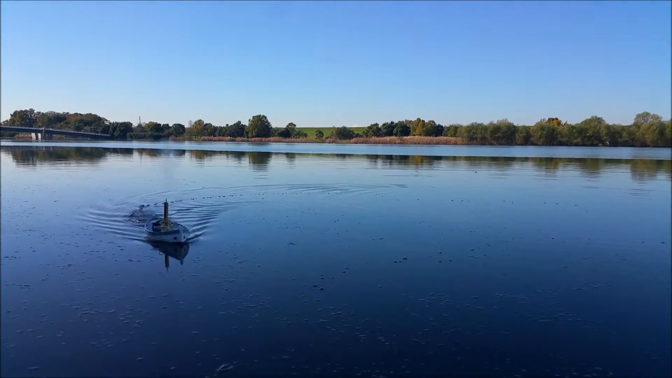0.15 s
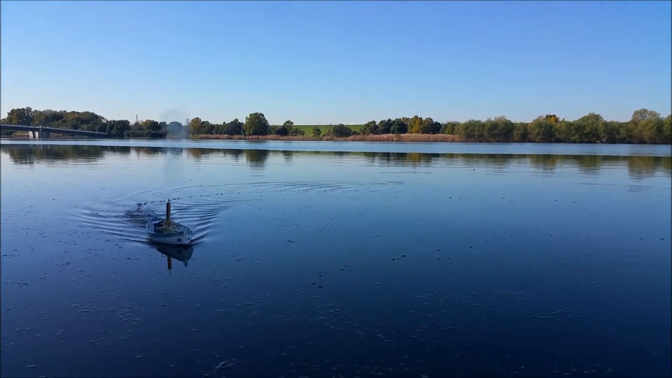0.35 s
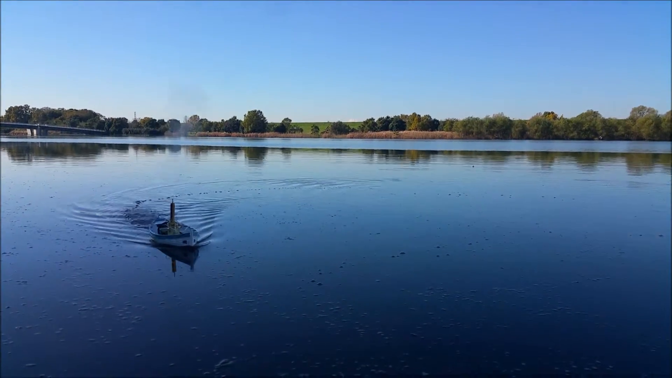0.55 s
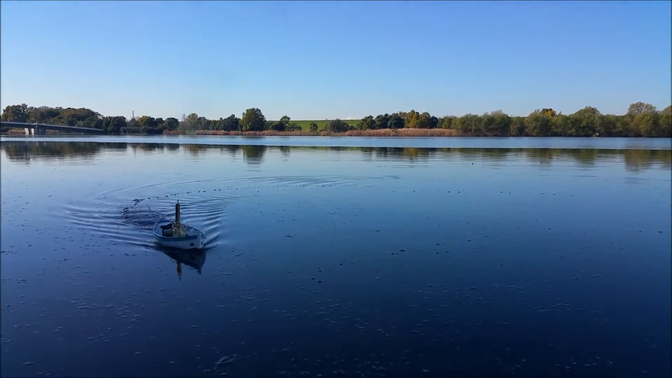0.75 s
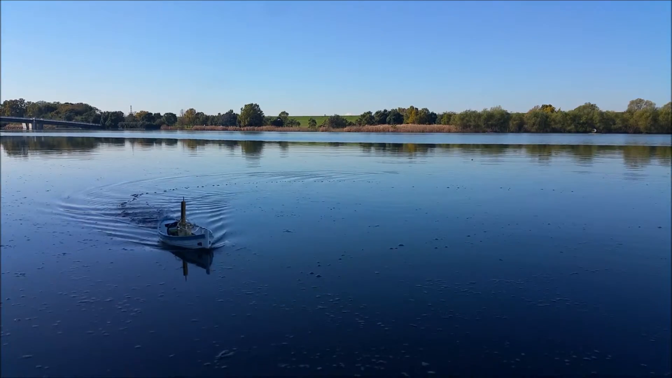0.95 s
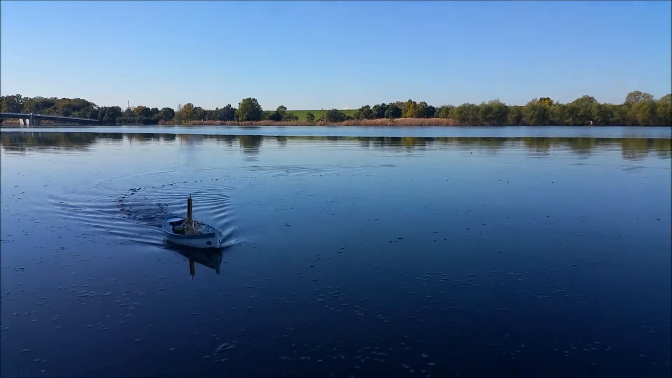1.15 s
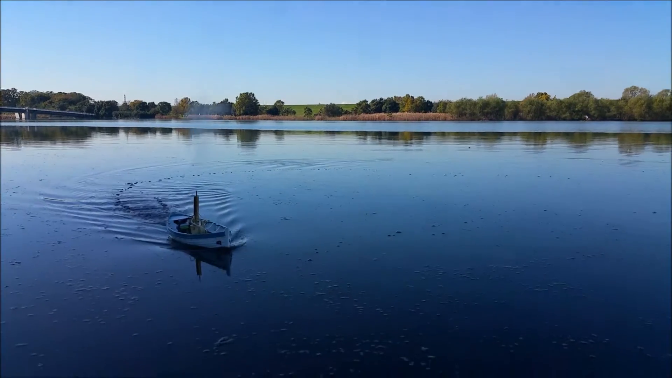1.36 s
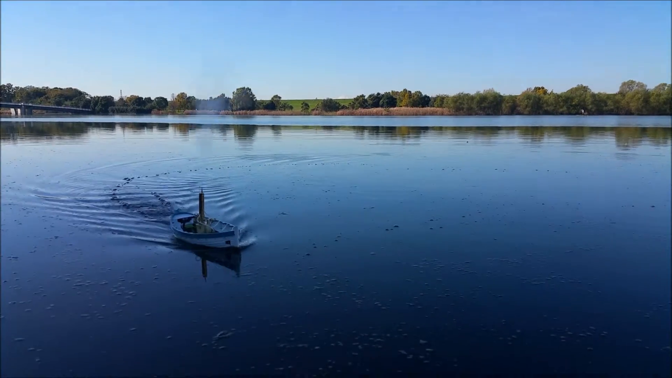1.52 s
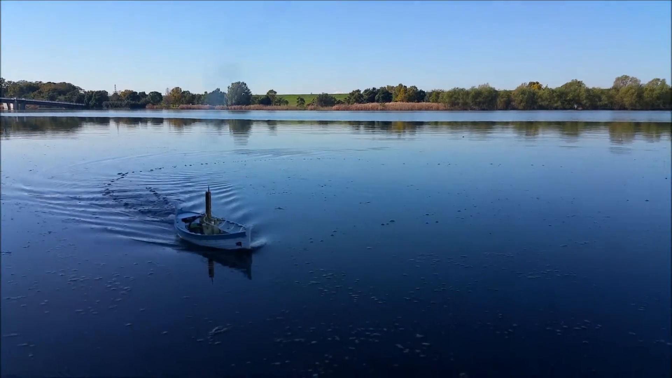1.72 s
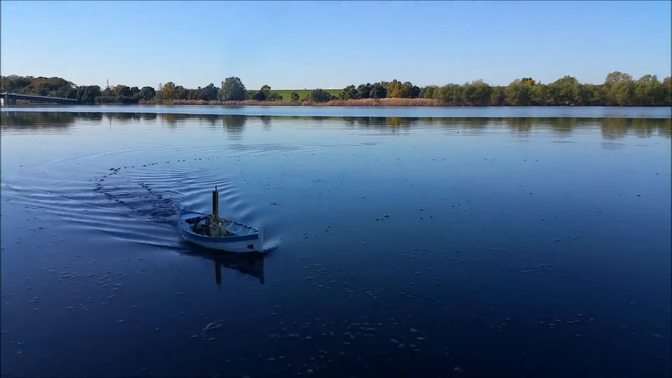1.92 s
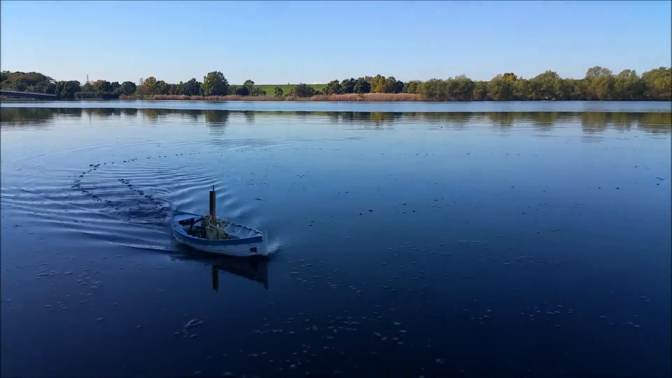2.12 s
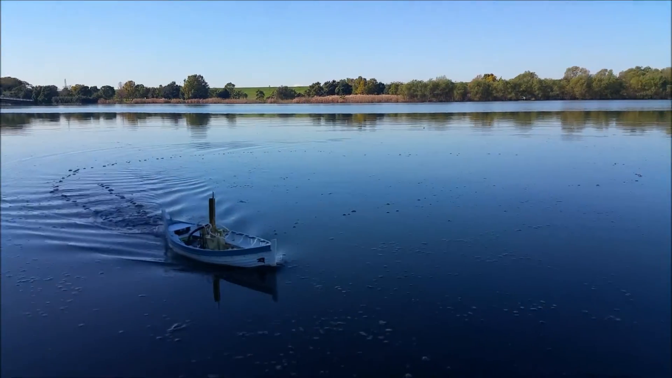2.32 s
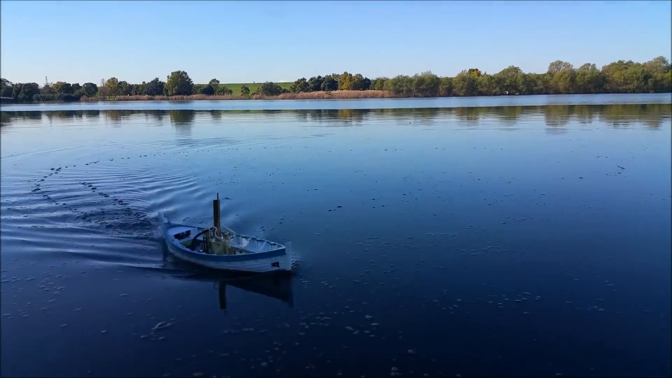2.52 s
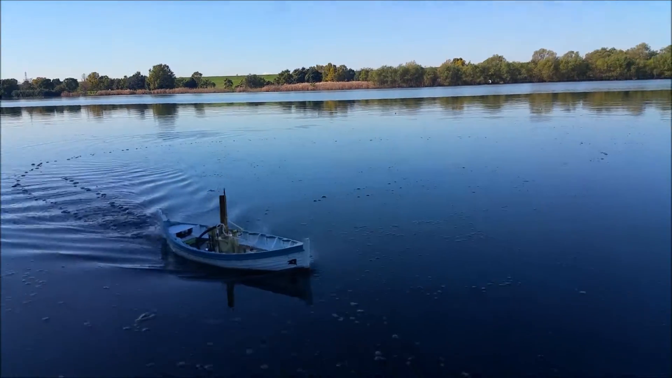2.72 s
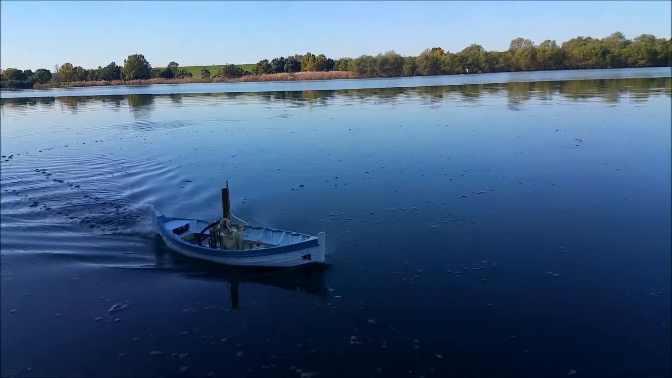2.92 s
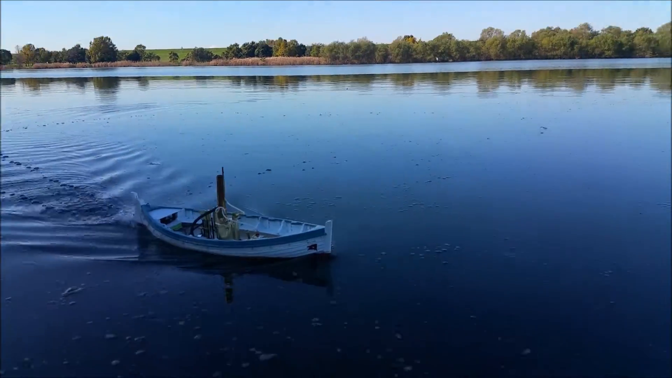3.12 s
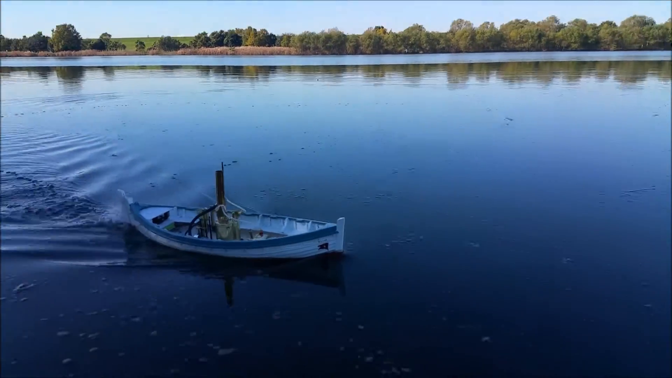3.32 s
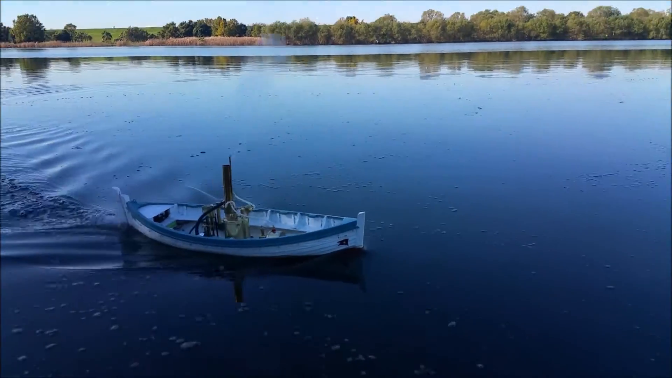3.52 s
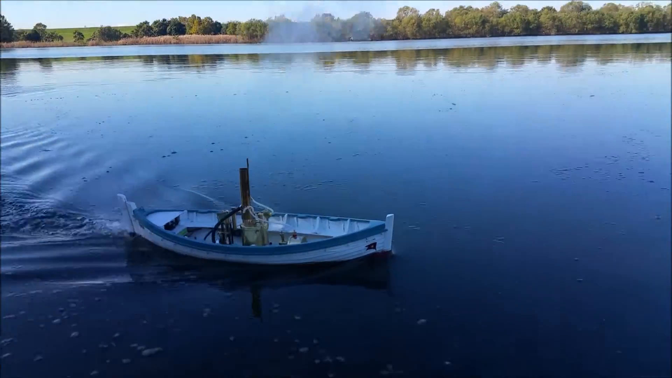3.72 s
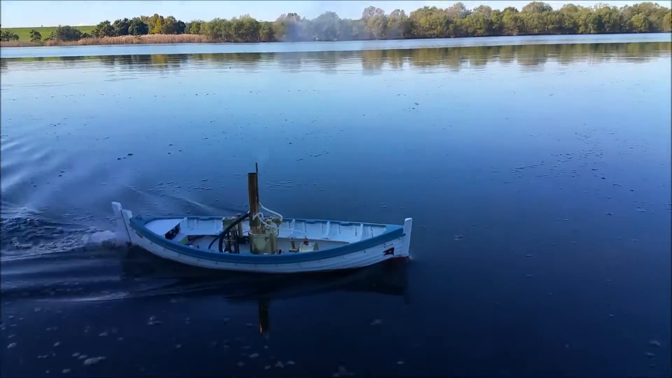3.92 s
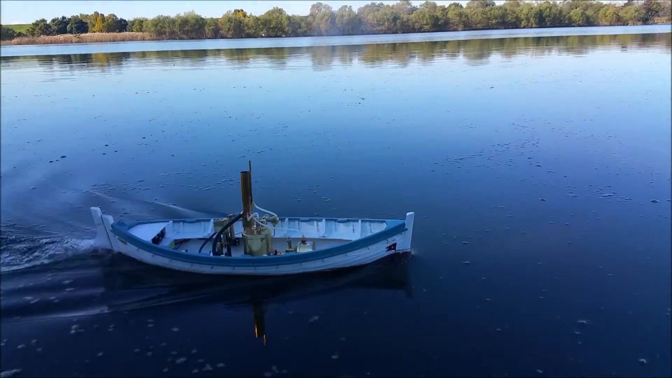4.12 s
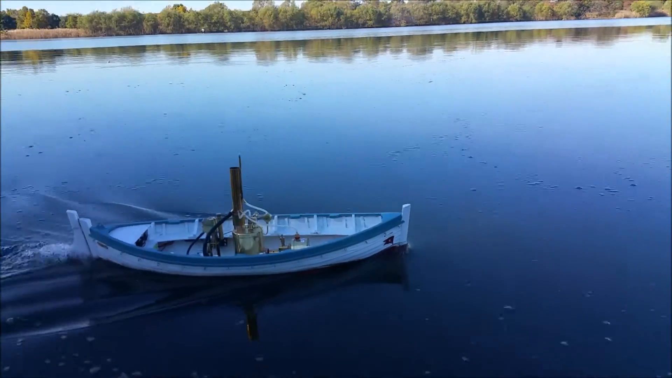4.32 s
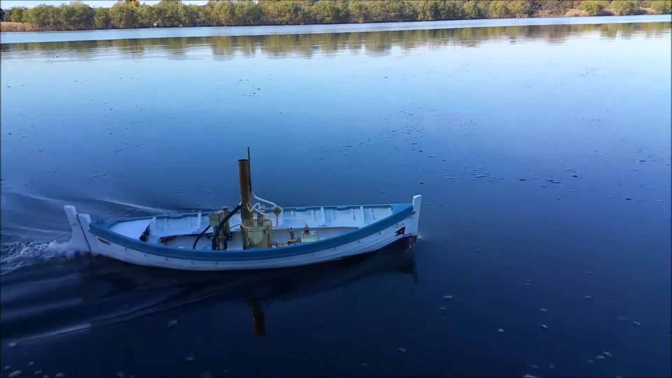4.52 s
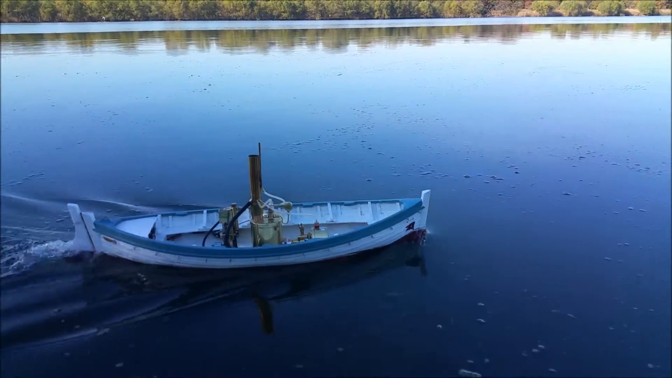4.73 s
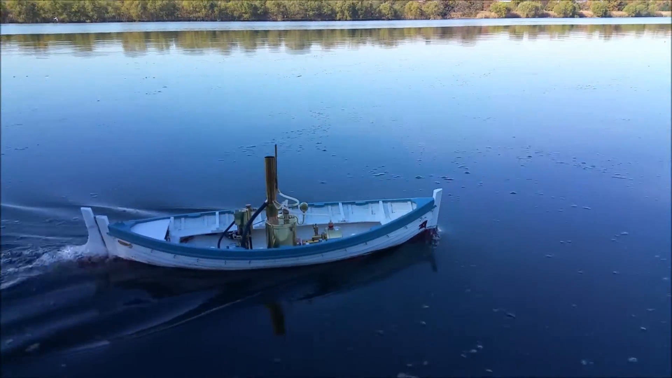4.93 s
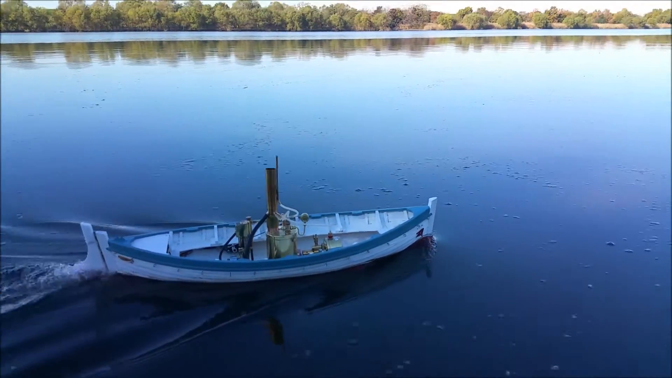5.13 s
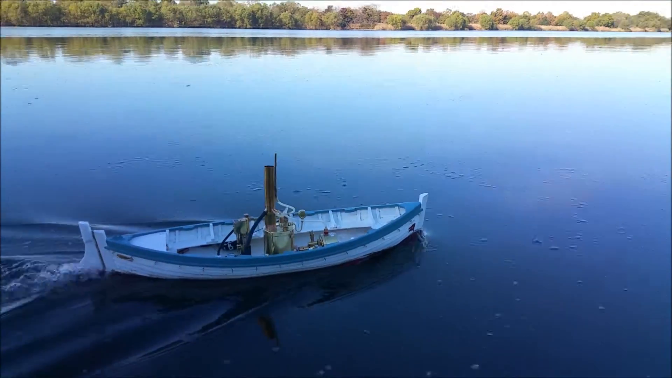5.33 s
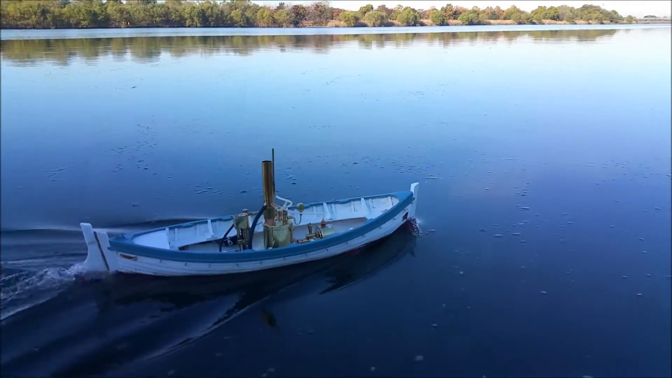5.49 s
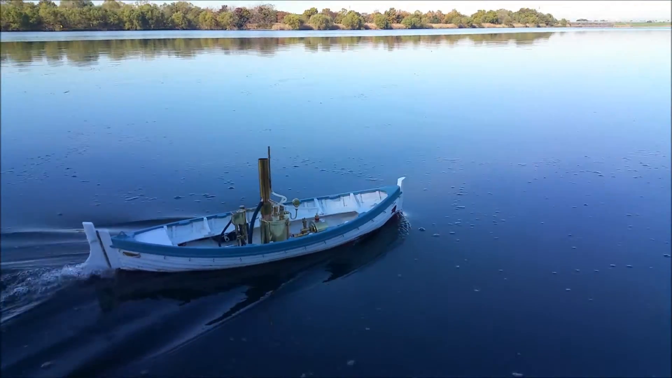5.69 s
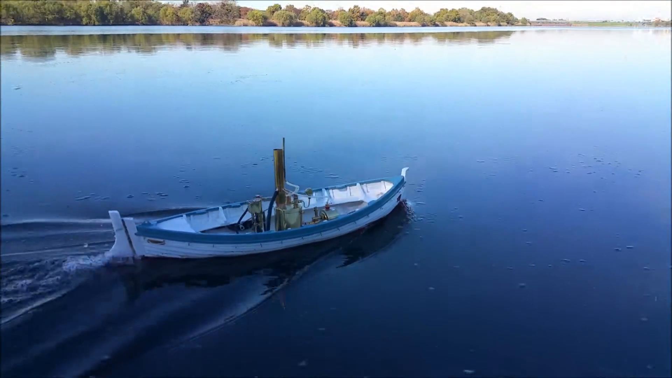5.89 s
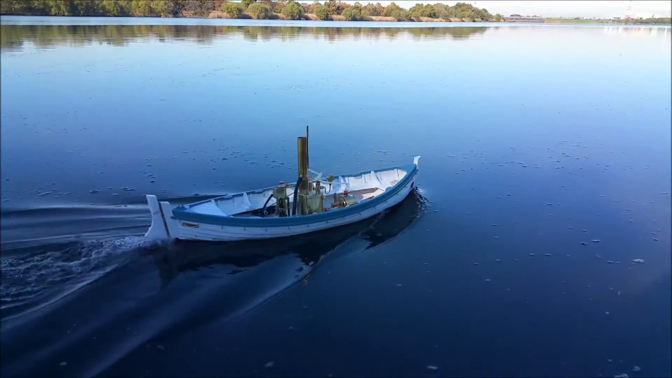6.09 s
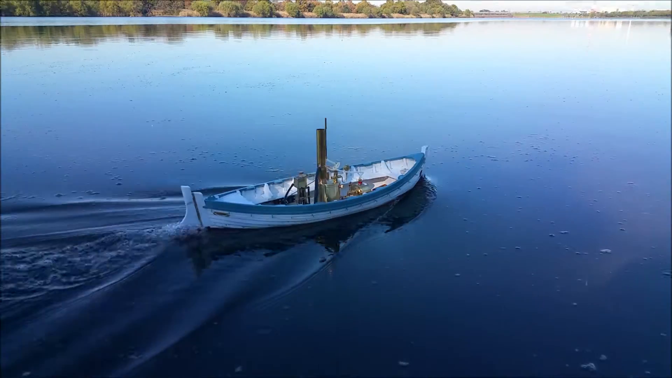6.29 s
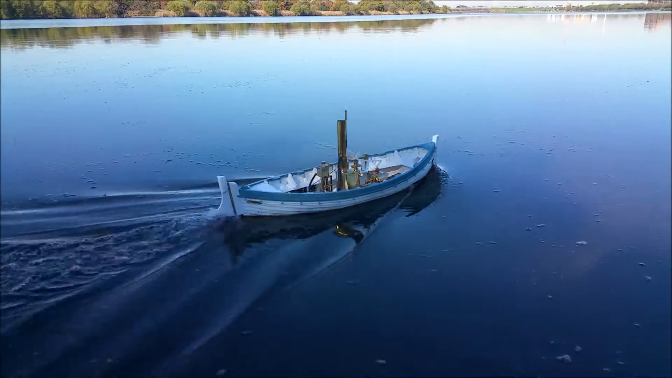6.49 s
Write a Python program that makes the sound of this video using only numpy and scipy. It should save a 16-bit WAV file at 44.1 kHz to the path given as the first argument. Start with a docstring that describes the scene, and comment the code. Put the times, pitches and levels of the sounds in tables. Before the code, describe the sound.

Outdoors by still water, a piercing steam whistle sounds three times, twice close together and once more later, much louder than anything else. Beneath it a small burner roars and a little steam engine clatters and puffs very fast, growing steadily as the boat nears. After the last blast it passes right by the microphone with sputtering hiss, a few hull knocks and bubbling at the bow, then eases slightly away.

```python
"""A shrill steam whistle sounds, the first of three blasts from a model launch on a calm lake.
A jet drives its short pipe; the tone interferes with its reflection from the water, swelling and
fading differently at each ear, and the bank returns a faint echo. The boat grows louder as it passes
close by: the burner roars through the resonances of the flue, the engine rattles and puffs four times
a turn, the funnel spits, and bubbles ring in the bow wave."""
import sys
import numpy as np
from scipy import signal
from scipy.fft import rfft, irfft, next_fast_len
from scipy.io import wavfile
from scipy.ndimage import uniform_filter1d

SR = 44100
rng = np.random.default_rng(int(sys.argv[2]) if len(sys.argv) > 2 else 0)


def to_wav(sig):
    """Store sig (one row per channel, or 1-D mono) as 16-bit WAV at the path in sys.argv[1].

    Samples outside -1..1 are clipped; the rate is SR.
    """
    pcm = np.clip(np.atleast_2d(sig), -1, 1) * 32767
    pcm = np.round(pcm).astype(np.int16)
    wavfile.write(sys.argv[1], SR, pcm.T)  # frames by channels


N = 288855
TIME = np.arange(N) / SR


def amp(db):
    """Amplitude ratio of a level in decibels."""
    return 10 ** (np.asarray(db) / 20)


def unit(x):
    """Normalisation to rms 1."""
    return x / np.sqrt(np.mean(x ** 2) + 1e-20)


def curves(rows):
    """Linear interpolation of each column of a timed table, at every sample."""
    times, *columns = np.transpose(rows)
    return [np.interp(TIME, times, column) for column in columns]


def spectrum_at(points, hz):
    """Interpolation of a spectrum on a logarithmic frequency axis."""
    f, value = np.transpose(points)
    return np.interp(np.log(hz + 1), np.log(f), value)


def colour(x, points):
    """Filtering by multiplication in the frequency domain."""
    size = next_fast_len(N + 4096)
    gain = amp(spectrum_at(points, np.fft.rfftfreq(size, 1 / SR)))
    return irfft(rfft(x, size) * gain, size)[..., :N]


# Likeness of the noise at the two ears: f/Hz, correlation coefficient
COHERENCE = [(30, 0.91), (150, 0.95), (400, 1), (700, 1), (1100, 0.13), (1800, 1), (2800, 0.36), (5000, 0),
             (15000, 0)]
def noise():
    """Partially coherent white noise at two ears: alike in the bass, independent in the high treble."""
    size = next_fast_len(N)
    mid, side = rfft(rng.standard_normal((2, size)))
    likeness = np.clip(spectrum_at(COHERENCE, np.fft.rfftfreq(size, 1 / SR)), -1, 1)
    mid, side = mid * np.sqrt((1 + likeness) / 2), side * np.sqrt((1 - likeness) / 2)
    return irfft(np.array([mid + side, mid - side]), size)[:, :N]


def wander(hz):
    """Random fluctuation of rms 1: noise low-passed at hz."""
    size = next_fast_len(N)
    f = np.fft.rfftfreq(size, 1 / SR)
    return unit(irfft(rfft(rng.standard_normal(size)) / (1 + (f / hz) ** 4), size)[:N])


def resonate(x, hz, width):
    """A damped resonator of peak gain 1; its centre may move, its bandwidth is in Hz."""
    phasor = np.exp(2j * np.pi * np.cumsum(hz * np.ones(N)) / SR)
    pole = np.exp(-np.pi * width / SR)
    return 2 * (phasor * signal.lfilter([1 - pole], [1, -pole], x / phasor + 1e-18)).real


def ring(x, hz, width):
    """Two resonators in cascade give a peak with steep flanks, at rms 1."""
    return unit(resonate(resonate(x, hz, width), hz, width))


def decay(kicks, tau_s):
    """Exponential relaxation after each impulse."""
    return signal.lfilter([1], [1, -np.exp(-1 / (tau_s * SR))], kicks + 1e-18)


def strikes(rows):
    """An impulse train from rows of t/s, level/dB."""
    times, db = np.transpose(rows)
    return np.bincount(np.round(times * SR).astype(int), amp(db), N)[:N]


# Engine speed, in strokes a second: t/s, f/Hz
STROKE_RATE = [(0, 73), (2, 93), (3.3, 97.6), (4.55, 87.6), (4.8, 80), (5.33, 86), (5.8, 81.7),
               (6.55, 89.5)]
def beats(pattern_db, spread_db, jitter_s):
    """Quasi-periodic excitation: four impulses a turn, uneven in size and timing."""
    stroke_count = np.floor(np.cumsum(curves(STROKE_RATE)[0]) / SR)
    onsets = np.flatnonzero(np.diff(stroke_count)) / SR
    size, late = rng.standard_normal((len(onsets), 2)).T
    levels_db = np.resize(pattern_db, len(onsets)) + spread_db * size
    return strikes(np.c_[abs(onsets + jitter_s * late), levels_db])


NEAREST_S, NEAREST_M, BOAT_M_PER_S = 5.33, 1.58, 0.97
def nearness():
    """Uniform straight motion: nearest distance over present distance, 1 as the boat passes."""
    return NEAREST_M / np.hypot(NEAREST_M, BOAT_M_PER_S * (TIME - NEAREST_S))


def passing(db, loss_db):
    """Spreading loss: the level is db at the nearest point, less loss_db per doubling of distance."""
    return db + loss_db * np.log2(nearness())


# Spectrum of the open air: f/Hz, relative level/dB
AIR_SPECTRUM = [(15, -24), (28, -14), (55, -4), (120, -2.5), (200, -5.5), (400, -7), (1000, -35),
                (2500, -22), (8000, -90), (16000, -55)]
# One dull bump: t/s, f/Hz, level/dB, T60/s
BUMP = (4.28, 124, -29, .16)
def shore():
    """Ambient noise: the low rumble of the open air, and one bump, a damped sinusoid."""
    onset, hz, db, t60 = BUMP
    age = np.maximum(TIME - onset, 0)
    bump = amp(db - 60 * age / t60) * np.sin(2 * np.pi * hz * age)
    return amp(-40.5 + .9 * wander(9)) * unit(colour(noise(), AIR_SPECTRUM)) + bump


def bank(x, tail_db, t60, echo_db, echo_s):
    """Reflection and scattering at the bank: one echo and a short tail, their highest treble cut near 16 kHz."""
    t = np.arange(SR) / SR
    response = rng.standard_normal((2, SR)) * amp(-60 * t / t60) * (t > .008)
    response *= amp(tail_db) / np.linalg.norm(response, axis=1, keepdims=True)
    response[:, round(echo_s * SR)] += amp(echo_db)
    reflected = signal.fftconvolve(x, response, axes=1)[:, :N]
    return colour(reflected, [(6000, 3.5), (11000, 2), (16000, -7)])


def bubbles(rows, cycles):
    """Bubble resonance: each rises a little in pitch and decays by 1/e in the given cycles."""
    out, t = np.zeros(N + SR), np.arange(SR // 20) / SR
    for onset, db, hz in rows:
        age = hz * t / cycles
        rise = 1 + 0.019 * np.minimum(age, 5)
        out[round(onset * SR):][:len(t)] += amp(db) * np.exp(-age) * np.sin(2 * np.pi * hz * t * rise)
    return out[:N]


# Large bubbles in the bow wave: t/s, level/dB, f/Hz
BOW_PLOPS = [(4.505, -22, 840), (4.723, -26, 890), (5.011, -27, 930), (5.232, -19.5, 910),
             (5.567, -21.5, 940), (5.645, -20, 921), (5.872, -33, 991), (5.994, -21.5, 957),
             (6.192, -22, 850), (6.351, -28, 855)]
def bow_wave():
    """Trapped air oscillates: a few low plops, and many high droplets heard as the boat nears."""
    when, size, pitch, side = rng.random((1500, 4)).T
    onsets = when * (N - 1) / SR
    levels_db = np.interp(onsets, TIME, passing(db=-47, loss_db=7.8)) + 12 * size ** 2
    drops = np.c_[onsets, levels_db, 3000 * 3 ** pitch]
    spray = np.array([bubbles(drops[side < .5], cycles=12), bubbles(drops[side >= .5], cycles=12)])
    return spray + bubbles(BOW_PLOPS, cycles=7.3)


def water_mirror(direct, delay_ms):
    """Comb filtering: the water adds a weak copy, delayed most as the boat passes, stirred by ripples."""
    delay_s = (delay_ms * nearness() + .04 * wander(6)) / 1000
    return direct + .25 * np.array([np.interp(TIME - delay_s, TIME, ear) for ear in direct])


# Spectra of the exhaust steam and of its finest hiss, heard nearby: f/Hz, relative level/dB
PUFF_SPECTRUM = [(1500, -36), (3500, 8), (5200, 2.5), (7300, 1.5), (8700, -5), (9700, -5), (12500, -11.5),
                 (15500, -31)]
FIZZ_SPECTRUM = [(6000, -20), (9500, 4), (12000, 6), (14000, 4), (16000, -5)]
# Drops of condensate spat from the funnel: t/s, relative level/dB
CONDENSATE = [(4.4286, -34), (4.5912, -34), (4.6945, -38), (4.7813, -29), (5.012, -37), (5.255, -37),
              (5.3744, -40), (5.5051, -34), (5.6518, -35)]
def funnel():
    """Modulated flow noise: each stroke releases a puff of steam, and now and then a drop of water."""
    puffs = decay(beats([1.5, -1, 0, -1], spread_db=2.5, jitter_s=.0004), tau_s=.0035)
    flow = unit(.5 + puffs) * amp(.9 * wander(20))
    # wet steam sputters in patches
    wet = sum(ring(noise(), hz, width=1300) * amp(3.2 * wander(60)) for hz in (4300, 6200, 7800))
    steam = unit(unit(colour(noise(), PUFF_SPECTRUM)) + .65 * unit(wet))
    fizz = amp(-15.5) * nearness() ** 0.54 * unit(colour(noise(), FIZZ_SPECTRUM))
    spits = amp(2) * decay(strikes(CONDENSATE), tau_s=.0024)
    envelope = amp(passing(db=-43.5, loss_db=9)) * flow + spits
    return water_mirror((steam + fizz) * envelope, delay_ms=0.786)


# Harder knocks of the running gear: t/s, relative level/dB
GEAR_KNOCKS = [(.793, -22), (.946, -25), (.98, -24), (1.042, -25), (2.367, -22), (2.583, -22),
               (4.8277, -13), (5.094, -19), (5.324, -17), (5.54, -19), (5.723, -19), (5.897, -15),
               (6.375, -17)]
# Modes of the hull under a knock: f/Hz, relative level/dB, T60/s
HULL_MODES = [(560, 0, .045), (830, -7, .025), (1790, -15, .03)]
def knocks():
    """Impulse response: the wooden hull answers each knock with a sum of damped modes."""
    t = np.arange(SR // 10) / SR
    response = sum(amp(db - 60 * t / t60) * np.sin(2 * np.pi * hz * t) for hz, db, t60 in HULL_MODES)
    return amp(-2.5) * signal.oaconvolve(strikes(GEAR_KNOCKS), response / abs(response).max())[:N]


# Modes of the metal engine frame: f/Hz, bandwidth/Hz, relative level/dB
FRAME_MODES = [(2130, 280, -9.5), (2721, 117, 4), (2996, 220, -3.5), (3744, 340, -2), (4480, 150, -5.5)]
# Spectrum of the bearing rattle: f/Hz, relative level/dB
RATTLE_SPECTRUM = [(500, -7), (1000, -16), (1500, 8), (2200, 3), (2480, -2), (2900, -0.5), (5000, -17),
                   (9000, -12), (16000, -27)]
# Strongest resonance of the hull: t/s, f/Hz, level/dB
HULL_RESONANCE = [(0, 1660, -46.5), (1.3, 1732, -47.5), (1.95, 1800, -46.5), (2.6, 1770, -52.5),
                  (3.9, 1740, -48), (4.6, 1770, -38.5), (5.3, 1782, -36), (6.05, 1776, -35),
                  (6.55, 1770, -41.5)]
def engine():
    """Impact excitation: play in the bearings rattles on every stroke and rings the frame and hull."""
    force = unit(.35 + decay(beats([2, -2, 0, -2], spread_db=3, jitter_s=.0008), tau_s=.0045))
    blows = noise() * force
    modes = unit(sum(amp(db) * ring(blows, hz, width) for hz, width, db in FRAME_MODES))
    frame = amp(passing(db=-43, loss_db=8)) * modes
    rattle = amp(passing(db=-42, loss_db=7)) * unit(colour(noise() * force, RATTLE_SPECTRUM))
    hull_hz, hull_db = curves(HULL_RESONANCE)
    hull = amp(hull_db) * ring(blows, hull_hz, width=140)
    return rattle + frame + hull + knocks()


# Modes of the flue: f/Hz, bandwidth/Hz, relative level/dB from the bow, the quarter and the side
FLUE_MODES = [(460, 148, -6, -2.5, -0.5), (578, 182, -1, 2.5, 1.5), (681, 86, 1.5, -7, -9),
              (745.6, 95, 0.5, -5.5, -16), (856.7, 59, -10.5, -1.5, -10), (930, 112, 1, -26, -7),
              (1126, 94, -19, -9, -20), (1205, 120, -17, -21, -8.5)]
# Spectrum of the broad roar: f/Hz, relative level/dB
ROAR_SPECTRUM = [(100, -15.5), (330, -9), (420, 1.5), (600, 2), (760, -5), (900, -7), (1050, -5),
                 (1250, -34), (1450, -14), (2200, -13.5), (4000, -34)]
def burner():
    """Combustion noise drives the flue's modes, whose balance shifts as the boat shows its side."""
    aspect = 2 * nearness() ** 1.61  # 0 bow on, 1 quarter, 2 side on
    draught = unit(1 + .9 * decay(beats([2, -2, 0, -2], spread_db=3, jitter_s=.0012), tau_s=.004))
    flutter = draught * amp(.7 * wander(40))
    flames = noise() * flutter, noise() * flutter  # neighbouring modes are driven independently
    gains = [amp(np.interp(aspect, np.arange(3), row[2:])) for row in FLUE_MODES]
    modes = [ring(flames[k % 2], hz, width) for k, (hz, width, *_) in enumerate(FLUE_MODES)]
    flue = unit(sum(gain * mode for gain, mode in zip(gains, modes)) / np.linalg.norm(gains, axis=0))
    broadband = amp(-6.5) * unit(colour(noise() * flutter, ROAR_SPECTRUM))
    roar = amp(passing(db=-27.5, loss_db=4.5)) * unit(flue + broadband)
    boom = amp(passing(db=-38, loss_db=6.5)) * ring(noise(), hz=208.7, width=135)
    return roar + boom


# Steam that slips out before the first blast: t/s, level/dB
FIRST_SPURT = (.125, -29)
def chiff():
    """Onset and release transients: as the valve moves, the weak jet only breathes across the pipe."""
    opens, shuts, *_, jet_db, _ = np.transpose(WHISTLE_BLASTS)
    gusts = np.r_[np.c_[opens + .003, jet_db + 11], np.c_[shuts - .003, jet_db + 6], [FIRST_SPURT]]
    envelope = uniform_filter1d(decay(strikes(gusts), tau_s=.008), size=200)
    return ring(noise(), hz=5100, width=650) * envelope


SCOOP_HZ, SAG_HZ_PER_S = 424, 52.3  # the pitch starts flat, then sinks as the boiler loses pressure
DROP_HZ, DROP_S = 234, 0.0043  # and falls away as the valve shuts
ATTACK_S, RELEASE_S = 0.02, 0.0047
# Spectra of the jet's hiss and of the sizzle at the lip: f/Hz, relative level/dB
JET_SPECTRUM = [(1500, -5.5), (3300, -12), (4200, -5), (4900, 0), (5600, 8.5), (6500, 2.5), (8000, -3.5),
                (9600, -6.5), (11100, -11), (12500, -18), (16000, -21)]
SIZZLE_SPECTRUM = [(11000, -40), (13000, -20), (14300, -11), (15200, -3), (15700, 0), (15900, -25)]
# Interference of the tone with its reflection from the water, one table a blast:
# t/s, swell/dB, left minus right level/dB, left phase lead/rad
INTERFERENCE = [
    [(0.173, 0.0, -2.0, 3.1), (0.239, -4.0, -8.0, 1.1), (0.267, -3.5, -14.0, 4.4), (0.338, 2.5, 0.0, 3.5),
     (0.418, 5.0, 0.0, 3.5), (0.474, 0.0, -3.0, 3.0), (0.536, 0.5, -4.0, 2.9), (0.63, -0.5, -5.0, 2.9)],
    [(1.216, 0.0, 1.0, 2.6), (1.235, 2.0, -4.0, 2.9), (1.279, -12.0, -3.0, 4.5), (1.306, 4.5, -2.0, 2.8),
     (1.46, 5.0, 7.0, 2.5), (1.545, -1.5, -5.0, 2.5), (1.618, 0.0, 0.0, 2.9), (1.662, 2.5, -3.0, 2.1),
     (1.815, -0.5, -7.0, 1.9)],
    [(3.62, -1.0, 1.0, 1.2), (3.638, -4.5, 10.0, 0.6), (3.717, -0.5, -3.0, 1.3), (3.833, 2.5, 2.0, 1.4),
     (3.896, -3.0, -8.0, 2.8), (3.947, 1.5, 2.0, 3.5), (4.041, 1.5, 4.0, 1.8), (4.094, 2.0, 0.0, 2.8),
     (4.191, 1.5, -2.0, 1.6)],
]
# Blasts: opening t/s, shutting t/s, f/Hz, pressure rise t/s, level/dB of tone, octave, jet and sizzle
WHISTLE_BLASTS = [(.146, 0.637, 5568, 0.022, -13.5, -47, -39.5, -36.5),
                  (1.196, 1.825, 5586, 0.0035, -16.5, -44.5, -36, -36.5),
                  (3.578, 4.196, 5594, 0.0062, -11.5, -31.5, -33, -35)]
def whistle():
    """A jet-driven pipe resonance: the pitch follows the steam pressure, and hiss surrounds the tone."""
    out, ears = np.zeros((2, N)), np.array([[.5], [-.5]])
    jet = unit(colour(noise(), JET_SPECTRUM))
    sizzle = unit(colour(noise(), SIZZLE_SPECTRUM))
    unsteady_hz = 11 * wander(130) + 20 * wander(900)
    shimmer = amp(.45 * wander(150) + .45 * np.array([wander(60), wander(60)]))
    octave_gain = amp(-4 * ears + 2 * np.array([wander(40), wander(40)]) + 2 * wander(300))
    sputter = amp(1.1 * wander(200) + .8 * wander(15))
    for blast, water in zip(WHISTLE_BLASTS, INTERFERENCE):
        opens, shuts, pitch_hz, rise_s, tone_db, octave_db, jet_db, sizzle_db = blast
        age, remaining = np.maximum(TIME - opens, 0), np.maximum(shuts - TIME, 0)
        scoop, drop = SCOOP_HZ * np.exp(-age / rise_s), DROP_HZ * np.exp(-remaining / DROP_S)
        hz = pitch_hz - scoop - SAG_HZ_PER_S * age - drop
        phase = 2 * np.pi * np.cumsum(hz + unsteady_hz) / SR
        swell_db, balance_db, lead = curves(water)
        tone = amp(tone_db + swell_db + ears * balance_db) * shimmer * np.sin(phase + ears * lead)
        octave = amp(octave_db) * octave_gain * np.sin(2 * phase + ears)
        hiss = sputter * (amp(jet_db) * jet + amp(sizzle_db) * sizzle)
        sounding = np.clip(np.minimum(age / ATTACK_S, .5 + (shuts - TIME) / RELEASE_S), 0, 1)
        flow = np.interp(TIME, [opens - .002, opens + .008, shuts - .01, shuts + .014], [0, 1, 1, 0])
        out += np.sqrt(2) * sounding * (tone + octave) + flow * hiss
    return out


def scene():
    """Superposition of the boat and the shore, the whistle, and its echo."""
    left, right = burner() + engine() + funnel() + bow_wave() + shore()
    # the left ear hears these 5 samples sooner and slightly louder
    boat_and_shore = np.array([left, np.roll(right, 5)]) * amp([[.3], [-.3]])
    blasts = whistle() + chiff()
    return boat_and_shore + blasts + bank(blasts, tail_db=-24, t60=.42, echo_db=-33, echo_s=.1)


DUCK_ABOVE_DB, DUCK_SHARE, RECOVER_DB_PER_S, CUTOFF_HZ = -20.5, 0.17, 54, 15800
def record(dry):
    """Compression and band limiting: the whole sound ducks a little under each blast."""
    power_db = 10 * np.log10(abs(uniform_filter1d((dry ** 2).mean(0), size=600)) + 1e-12)
    recovery = RECOVER_DB_PER_S * TIME
    held_db = np.maximum.accumulate(power_db + recovery) - recovery
    over_db = np.maximum(held_db - DUCK_ABOVE_DB, 0)
    ducked = dry / amp(DUCK_SHARE * uniform_filter1d(over_db, size=300))
    lowpass = signal.firwin(511, CUTOFF_HZ, window=("kaiser", 9), fs=SR)
    return signal.oaconvolve(ducked, lowpass[None], "same", axes=1)


dry = scene()
out = record(dry)
to_wav(out)
```